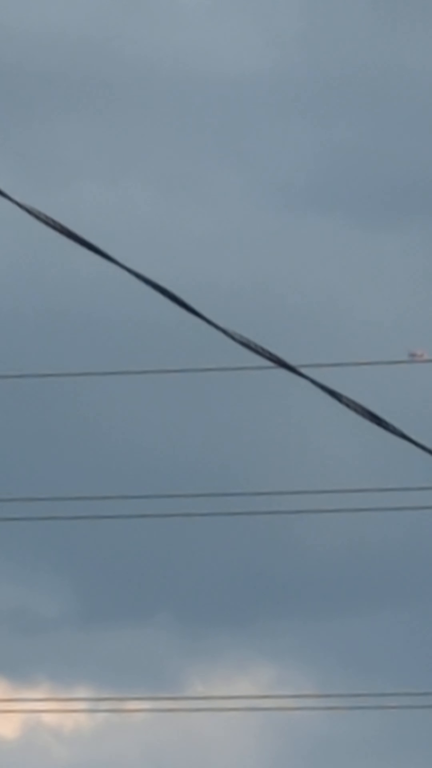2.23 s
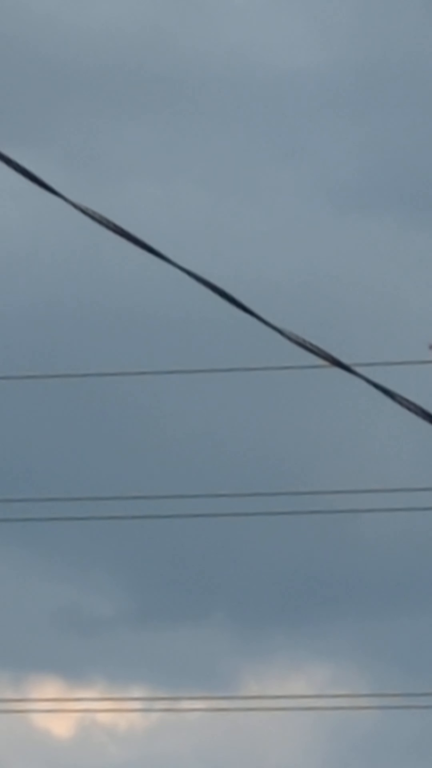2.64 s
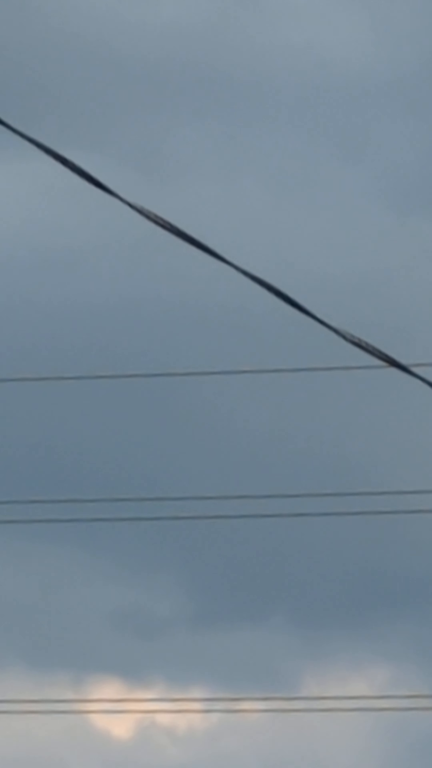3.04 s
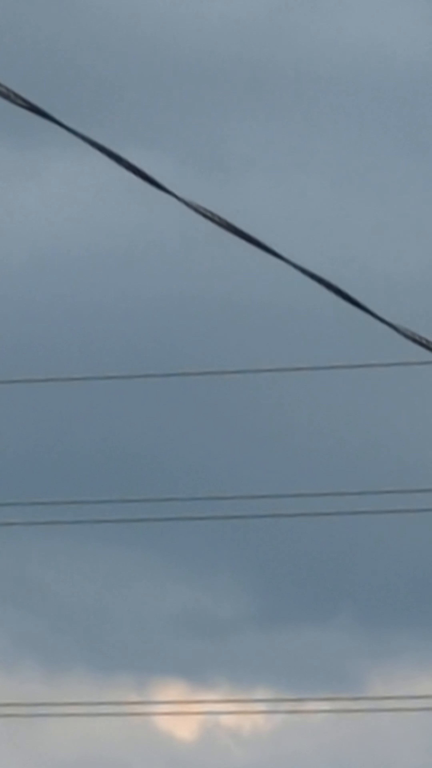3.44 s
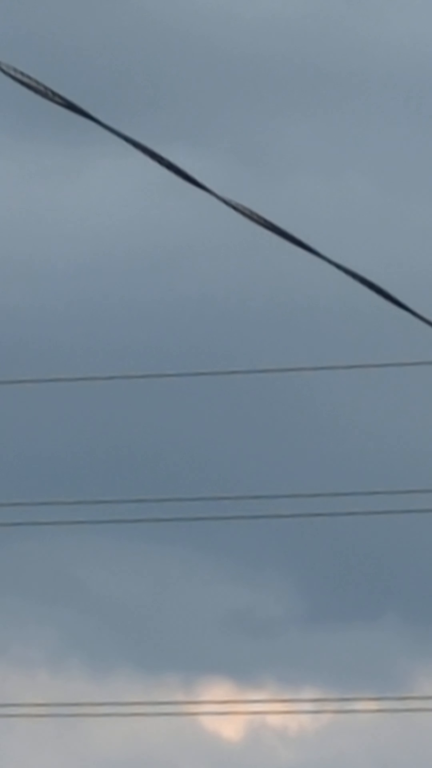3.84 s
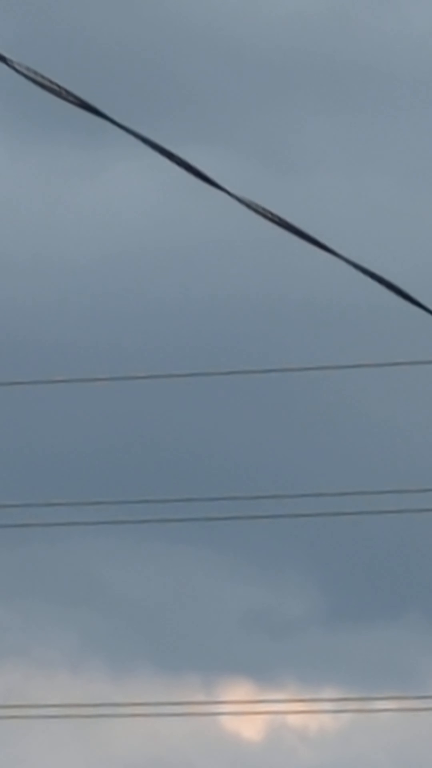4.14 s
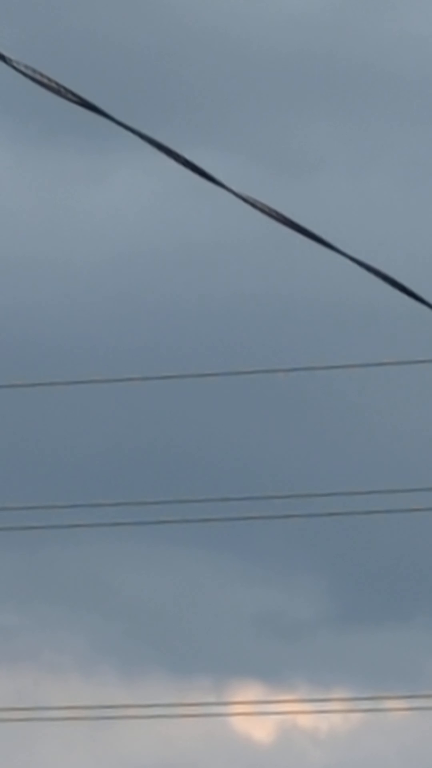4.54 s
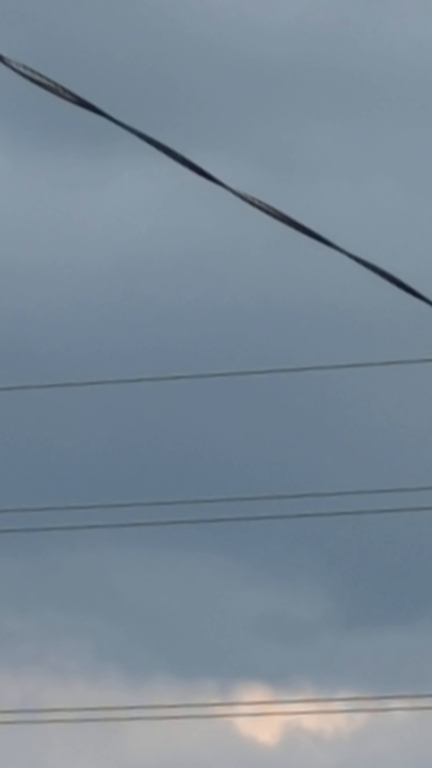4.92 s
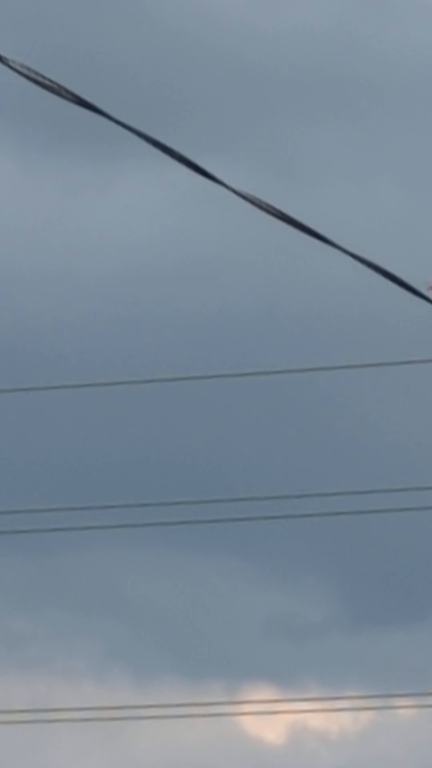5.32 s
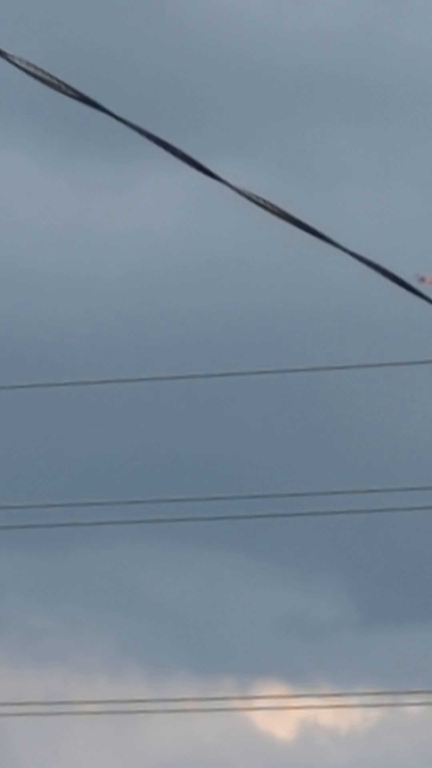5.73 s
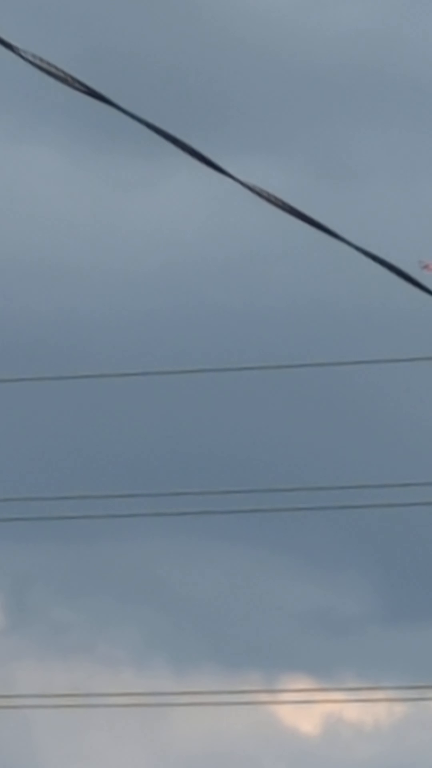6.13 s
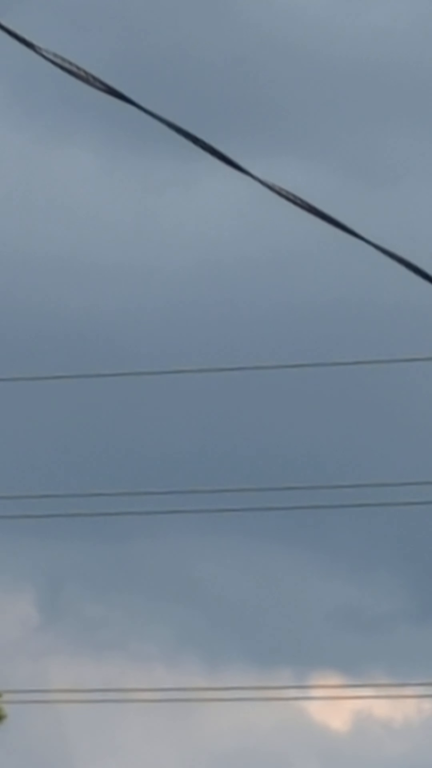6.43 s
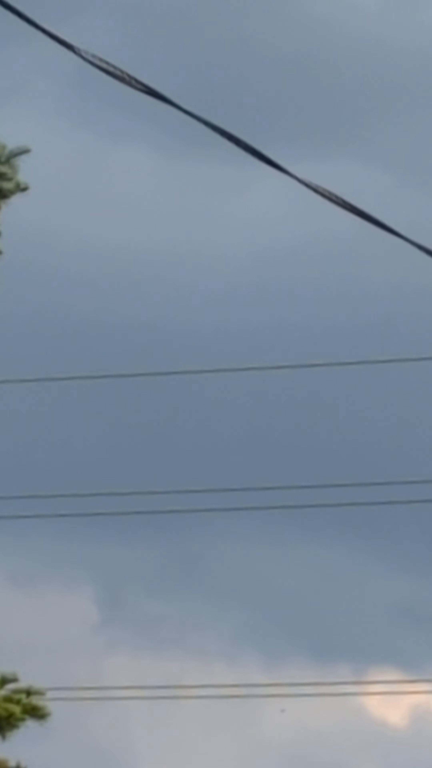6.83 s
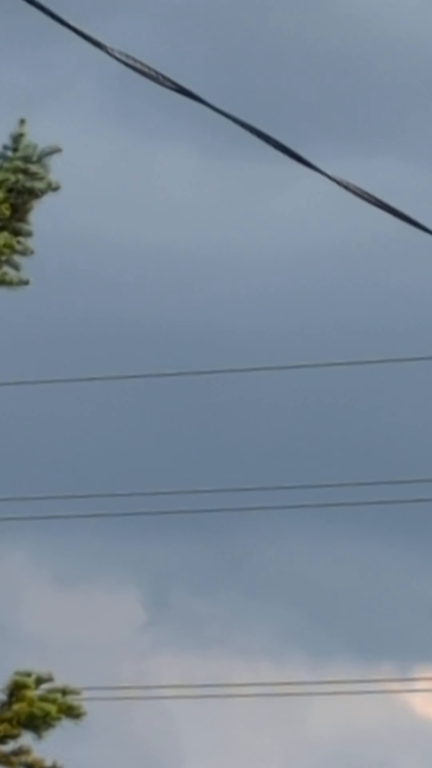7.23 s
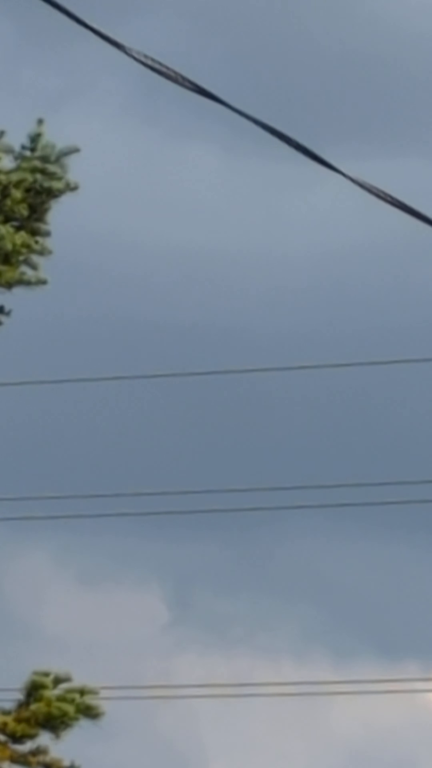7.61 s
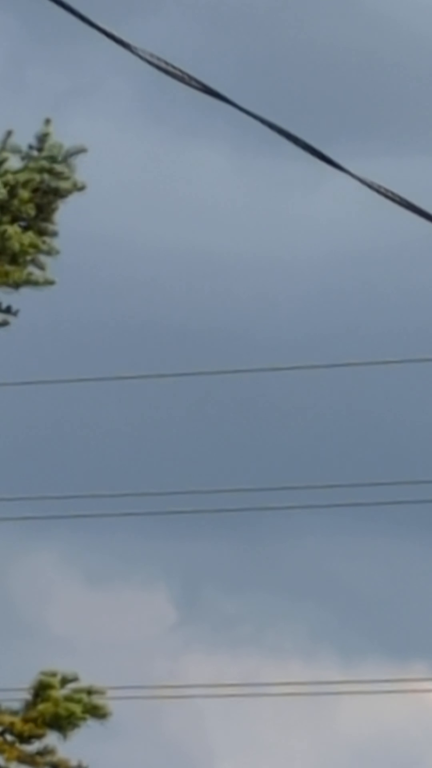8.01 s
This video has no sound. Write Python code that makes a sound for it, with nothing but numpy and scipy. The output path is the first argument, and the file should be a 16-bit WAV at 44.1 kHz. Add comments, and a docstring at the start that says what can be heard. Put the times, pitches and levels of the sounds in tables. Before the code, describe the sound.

Open-air stereo sound near a road: the throaty, wavering drone of a far-off radial-engine plane runs throughout, joined by thin cricket trills. Wind buffets the microphone in irregular low bumps, often stronger on one side. A mild whoosh of tyres comes near two seconds, a fainter one near four, then a much louder pass at six with low engine hum, fading before another approaches and something rustles briefly.

```python
"""From the start a biplane's seven-cylinder radial drones far overhead: shaft-locked tones creeping up in
pitch as its aspect turns, plus chopped noise. Crickets trill faintly, as falling notes with a fuzzy edge.
Gusts and thumps of low noise soon bump the microphone, and noise swells of hiss go by, most likely tyres.
The loudest, about six seconds in, brings gritty sizzle, a low exhaust hum of harmonics and thin whistles.
Another swell is building at the end, where a short rustle of bright noise comes."""
import sys
import numpy as np
from scipy import signal
from scipy.fft import rfft, irfft, next_fast_len
from scipy.io import wavfile
from scipy.ndimage import uniform_filter1d

SR = 44100
rng = np.random.default_rng(int(sys.argv[2]) if len(sys.argv) > 2 else 0)


def output_pcm(signal):
    """Save a mono or channel-first signal as 16-bit PCM at the path in sys.argv[1].

    Samples are clipped to [-1, 1] before scaling.
    """
    pcm = np.clip(np.atleast_2d(signal).T, -1, 1) * 32767
    wavfile.write(sys.argv[1], SR, np.round(pcm).astype(np.int16))


N = 360297
T = np.arange(N) / SR

# four-stroke cycle that sets every engine line: [t/s, rate/Hz]
ENGINE_CYCLE = [(0, 15.02), (.5, 15.13), (2.5, 15.79), (4, 16.1), (7, 16.45), (8.17, 16.64)]
# radiated engine lines, before offsets and fading; multiple 7 is firing, 4, 8, .. the two blades:
# [multiple of the cycle, nose-on level/dB, front-quarter level/dB, side-on level/dB,
#  rear-quarter level/dB, tail-on level/dB]
ENGINE_DIRECTIVITY = [(4, -47.5, -48.5, -56, -57.5, -56), (7, -64, -62, -52, -50, -50.5),
                      (8, -51.5, -58.5, -63, -59.5, -61), (9, -76, -65.5, -58.5, -72.5, -76),
                      (12, -72.5, -64, -73.5, -63, -59), (13, -76, -61, -72, -75, -72),
                      (14, -69, -70, -67.5, -74.5, -72.5), (15, -67.5, -69, -62.5, -57.5, -57),
                      (16, -52, -59, -64, -74, -60.5), (17, -65.5, -72, -56.5, -70, -61),
                      (18, -68.5, -71.5, -60.5, -57, -54.5), (19, -61, -58, -69, -55, -55),
                      (20, -58.5, -59.5, -54.5, -70.5, -66), (22, -64, -68, -75.5, -75, -70),
                      (24, -65, -64, -62.5, -67.5, -73.5), (27, -82.5, -70, -67, -69, -75),
                      (28, -73, -69, -66, -72, -75), (37, -71.5, -75.5, -76.5, -77.5, -79),
                      (38, -68, -75, -79, -67.5, -72)]
# which way the biplane faces: [t/s, aspect (0 nose on, 2 side on, 4 and above tail on)]
BIPLANE_ASPECT = [(1.4, 0), (2.15, 1.13), (2.8, 0.65), (3.9, 2.1), (4.4, 2), (4.9, 3), (6.35, 3), (7.3, 5)]
# drone as the air carries it down; only its swing about the median is used: [t/s, level/dB]
DRONE_CARRY = [(0.0, -59.5), (0.5, -53), (1.15, -57.5), (1.45, -53), (1.84, -55), (2.21, -48.5),
               (2.58, -53), (2.8, -62), (3.21, -67.5), (3.55, -55.5), (3.93, -48.5), (4.5, -52),
               (5.35, -53), (6.3, -50.5), (6.8, -55), (7.4, -51.5), (7.85, -58), (8.17, -55.5)]
# moments when one band swells: mostly the drone blooming, and at 0.22 s a brief low bump: # [t/s, half
# length/s, centre f/Hz, width/Hz, lift of the lines/dB, roar level/dB]
DRONE_BLOOMS = [(.22, 0.062, 134.9, 27, 4.5, -57), (0.63, 0.11, 570, 110, 3, -67),
                (1.458, 0.21, 267, 42, 3.5, -76), (2.02, 0.22, 501.5, 120, 3.5, -60),
                (2.204, 0.15, 209.8, 12, 1.5, -59), (2.598, 0.38, 125.2, 6, 6, -63),
                (2.723, 0.084, 320, 7.4, 8.5, -73), (3.4, 0.23, 1000, 350, -0.5, -68),
                (4.048, 0.18, 385, 12, 4, -70), (4.65, .28, 275, 6, 7.5, -76.5),
                (4.95, 0.17, 440.5, 24, 7.5, -68), (6.198, 0.3, 427.6, 47, 7, -66),
                (6.33, 0.1, 630, 55, 0, -61), (6.6, 0.26, 115.3, 22.6, 0.5, -52),
                (7.23, 0.093, 606, 68, 7, -63), (7.346, 0.3, 267, 14, 2.5, -66),
                (7.6, 0.35, 200.9, 6.6, 8, -67)]
# propeller wash spectrum, before its offset: [f/Hz, level/dB per Hz]
WASH_SPECTRUM = [(60, -93), (130, -79.5), (205, -80), (320, -80), (450, -83.5), (580, -83), (740, -88),
                 (1050, -94), (2500, -115)]

# vehicles going by: [closest t/s, clears cover t/s, approach time/s, leaving time/s,
#  tyre hiss level/dB, tread rasp level/dB, low roar level/dB]
VEHICLE_PASSES = [(2.04, 1.41, 0.85, 1.29, -67, -66.5, -55.5), (4.1, 1.6, 1, 0.86, -70.5, -75, -70),
                  (6.15, 5.18, 0.64, 1.065, -57.5, -55.5, -57), (8.3, 7.9, 0.85, .9, -67.5, -77.5, -71.5)]
PASS_FALLOFF = 3.1  # power of distance by which a vehicle fades
SCREEN_DB, EMERGE_S = -6, 0.14  # level drop while hidden; time constant of clearing cover
FAR_TYRES_DB = -85.5  # steady hiss from the rest of the road
# tyre hiss: [f/Hz, level/dB per Hz relative to the pass]
TYRE_SPECTRUM = [(100, -44.5), (520, -24.5), (800, -29.5), (1150, -28), (1800, -30.5), (2500, -33.5),
                 (3100, -35.5), (4000, -39), (5300, -46), (6500, -52.5), (9200, -58), (11000, -66.5),
                 (12500, -70.5), (14500, -78)]
# tread rasp, beamed sideways so that it peaks at the closest point: [f/Hz, level/dB per Hz relative]
TREAD_SPECTRUM = [(1100, -54), (1800, -35.5), (2350, -32), (2850, -35.5), (3500, -48), (5000, -66.5)]
TREAD_BEAM, TREAD_RASP_DB = 2.6, 3  # fade exponent relative to the hiss; depth of the patches
# low roar of a vehicle: [f/Hz, level/dB per Hz relative to the pass]
ROAR_SPECTRUM = [(80, -37.5), (200, -20.5), (280, -25), (400, -28), (580, -30.5), (800, -33.5),
                 (1500, -42.5), (2500, -55)]
# exhaust of the loudest vehicle, before the overtone levels: [t/s, firing f/Hz, level/dB]
EXHAUST_HUM = [(5.1, 42.57, -63), (5.45, 41.45, -43.5), (5.7, 40.46, -36), (6.1, 40.93, -40.5),
               (6.5, 41.17, -39), (6.75, 42.22, -32), (7.2, 42.26, -31.5), (7.7, 43.3, -34.5),
               (8.17, 43.45, -40)]
# exhaust overtones: [multiple of the firing rate, relative level/dB]
EXHAUST_ORDERS = [(1, -3.5), (2, -24), (3, -34.5)]
HISS_THROB = .14  # how deeply the exhaust beat chops the hiss (0-1)
# sizzle of grit under the nearest tyres: [t/s, level/dB]
SIZZLE_SWELL = [(5.3, -108), (5.55, -81), (5.85, -72), (6.3, -77), (6.65, -76), (6.95, -76.5), (7.4, -94)]
# sizzle colour: [f/Hz, level/dB per Hz relative to the swell]
SIZZLE_SPECTRUM = [(2500, -53.5), (4000, -33.5), (5300, -34.5), (6600, -43), (9000, -47), (11300, -50.5),
                   (13500, -59)]
GRIT_DB, GRIT_HZ = 3, 130  # depth and rate of the crackle
# ticks of flung grit: [t/s, half length/s, level/dB]
GRIT_TICKS = [(5.632, .005, -71)]
# thin traffic whistles, one list each: [t/s, f/Hz, level/dB]
WHISTLE_PATHS = [
    [(5.5, 1738, -82), (5.8, 1740, -72), (6.35, 1742, -69), (6.8, 1740, -80), (7.4, 1740, -80),
     (7.9, 1741, -75), (8.17, 1740, -79)],
    [(2.3, 9800, -110), (2.4, 10100, -101), (2.52, 10350, -101), (2.58, 10750, -109), (2.68, 10300, -104),
     (2.75, 9850, -110)],
    [(5.75, 11100, -106), (6.05, 11250, -98), (6.45, 11700, -103), (6.9, 12350, -102.5),
     (7.35, 12700, -118)],
]
# fuzz of each whistle in turn: [width/Hz]
WHISTLE_WIDTHS = [4, 130, 240]
# low rumble of engines on the road: [t/s, relative level/dB]
RUMBLE_SWELL = [(0, -0.5), (1.2, 0.5), (2, -7), (3.2, -2), (3.8, -7), (4.9, -9), (5.7, -0.5), (6.7, 2.5),
                (7.3, -1.5), (8.17, -4.5)]
# rumble colour: [f/Hz, level/dB per Hz]
RUMBLE_SPECTRUM = [(30, -77), (52, -65.5), (70, -56.5), (88, -70.5), (130, -78.5), (180, -85), (300, -102)]

BREEZE_DB, EDDY_DB, EDDY_HZ = -59, 2.5, 3.8  # steady wind level; depth and rate of its eddies
# gusts on the microphone: [t/s, half length/s, left level/dB, right level/dB]
WIND_GUSTS = [(.95, 0.17, -57, -55), (1.32, 0.11, -51, -49), (1.64, 0.07, -43.5, -54),
              (1.88, 0.042, -46, -60), (2.08, 0.047, -45.5, -58), (2.32, 0.049, -41, -47.5),
              (2.66, 0.056, -42, -61), (2.97, 0.072, -48, -54), (3.16, 0.06, -44, -54),
              (3.44, 0.044, -49, -46), (3.61, 0.065, -51.5, -42), (4.05, .04, -58, -53),
              (4.32, 0.064, -62, -51.5), (5.27, 0.048, -52, -51), (5.42, 0.023, -46.5, -54),
              (5.62, 0.16, -45, -57), (6.55, 0.1, -49, -57), (6.82, 0.13, -45, -56),
              (7.8, 0.25, -62, -58.5)]
# wind buffeting: [f/Hz, level/dB per Hz relative to the gust]
BUFFET_SPECTRUM = [(5, -13), (15, -8.5), (30, -4), (50, -11), (80, -28), (130, -35), (220, -44.5),
                   (500, -71.5), (1500, -110)]
# sharper wind thumps: [t/s, half length/s, left level of the suck/dB, right level of the suck/dB]
WIND_THUMPS = [(1.356, 0.0088, -51, -30), (1.691, 0.0051, -51, -21.5), (1.72, 0.0087, -20, -33),
               (2.877, 0.0054, -20.5, -47), (2.951, 0.0094, -22, -45), (3, 0.0041, -25, -34),
               (3.139, 0.0094, -27, -40), (3.218, 0.0045, -25, -38), (6.895, 0.0078, -25, -45),
               (6.973, 0.0036, -21.5, -44)]
# turbulence in the thumps, before the wake and thump levels: [f/Hz, level/dB per Hz]
THUMP_SPECTRUM = [(8, -29.5), (30, -28.5), (70, -21), (130, -20.5), (200, -38.5), (500, -78.5),
                  (1500, -100)]
# brushes of the rustle: [t/s, half length/s, level/dB]
RUSTLE_BRUSHES = [(8.121, 0.0038, -66), (8.136, 0.0071, -64.5), (8.16, 0.014, -72)]
# rustle colour: [f/Hz, level/dB per Hz relative to the brush]
RUSTLE_SPECTRUM = [(1000, -65), (3500, -43), (6000, -38), (9500, -37), (11500, -50), (14000, -66)]
# cricket voices: [f/Hz, fall within a pulse/Hz, pulse rate/Hz, sounding share (0-1), width/Hz,
#  L-R level/dB, port lag/turns]
CRICKET_VOICES = [(4215, 300, 42.2, .8, 40, -4, .2), (4180, 140, 45.5, 1, 80, -3, .13),
                  (8330, 260, 17.5, .9, 110, 1, .38)]
# how loudly each cricket sings: [t/s, first level/dB, second level/dB, third level/dB]
CRICKET_SWELL = [(0, -85.3, -92, -101), (2.3, -82.7, -90, -97), (3.5, -84.2, -90.5, -102),
                 (5, -89.5, -93, -95.5), (5.8, -90, -94, -93), (8.17, -92, -95.5, -100)]
CRICKET_FUZZ = .45  # rms of the grass-scattered fuzz beside a steady note of rms 1
# distant outdoors with a haze of far insects on top: [f/Hz, level/dB per Hz]
BACKGROUND_SPECTRUM = [(12, -68), (35, -67), (80, -68), (160, -81.5), (250, -86), (450, -91), (700, -93),
                       (920, -90), (1250, -96.5), (1750, -99.5), (3000, -111), (5000, -123), (6700, -127),
                       (8200, -122.5), (9200, -133), (14000, -140)]

# how alike far sound is at the two microphone ports: [f/Hz, likeness (0-1)]
FAR_PORT_LIKENESS = [(30, .92), (120, .9), (250, .92), (600, .93), (1200, .75), (1800, .66), (2800, .38),
                     (4300, .38), (6000, .15), (7200, .2), (8300, .6), (9500, .08)]
# far sound between the ports: [f/Hz, L-R level/dB]
FAR_PORT_BALANCE = [(30, 0.5), (500, -2.5), (1100, -0.5), (2200, -4.5), (4000, -2), (6000, 2), (12000, 2.5)]
# how alike road sound is at the ports: [f/Hz, likeness (0-1)]
ROAD_PORT_LIKENESS = [(100, .94), (600, .85), (1200, .65), (2500, .67), (4000, .56), (5200, .66),
                      (7500, .6), (8800, .68), (10200, .25), (12000, .3)]
# road sound between the ports: [f/Hz, L-R level/dB]
ROAD_PORT_BALANCE = [(400, 0.5), (1100, -2), (2300, -6.5), (3500, -5), (5200, -3.5), (8000, 1),
                     (10000, 3.5), (12000, -2)]
FAR_PORTS = FAR_PORT_LIKENESS, FAR_PORT_BALANCE
ROAD_PORTS = ROAD_PORT_LIKENESS, ROAD_PORT_BALANCE
EDGE_HZ = 14500  # top of the passband


def gain_of(db):
    """Decibels to amplitude."""
    return 10 ** (np.asarray(db) / 20)


def evened(x):
    """Scales to rms 1."""
    return x / np.sqrt(np.mean(abs(x) ** 2) + 1e-30)


def curves(rows):
    """Each column of a table as a line through time."""
    s, *columns = np.transpose(rows)
    return [np.interp(T, s, column) for column in columns]


def read(points, hz):
    """A spectrum joined by straight lines over log frequency."""
    f, value = np.transpose(points)
    return np.interp(np.log(hz + 1), np.log(f), value)


def panned(db):
    """Left and right gains for a level difference, at constant power."""
    ratio = gain_of(np.atleast_1d(db))
    return np.array([ratio, np.ones_like(ratio)]) * np.sqrt(2 / (1 + ratio ** 2))


def bump(s, half_s):
    """A smooth bell in time."""
    return np.exp(-((T - s) / half_s) ** 2 / 2)


def wander(hz, size=16384):
    """Smooth random drift of rms 1 that moves up to about hz times a second."""
    f = np.fft.rfftfreq(size, T[-1] / size)
    lowpass = np.exp(-(f / hz) ** 2 / 2) * (f > 0)
    slow = irfft(rfft(rng.standard_normal(size)) * lowpass)
    return np.interp(T, np.linspace(0, T[-1], size), evened(slow))


def noise(spectrum, likeness=None, balance=None, lag_ms=0):
    """Noise at two ports: unrelated, or partly alike with the left port late and its balance tilted."""
    size = next_fast_len(N, True)
    hz = np.fft.rfftfreq(size, 1 / SR)
    roll_off = np.maximum(1, hz / spectrum[-1][0]) ** -4  # above the last point
    shape = gain_of(read(spectrum, hz)) * roll_off * np.sqrt(SR / 2)
    z = rfft(rng.standard_normal((2, size))) * shape
    if likeness is not None:
        same = np.clip(read(likeness, hz), 0, 1)
        late = np.exp(-2j * np.pi * hz * lag_ms / 1000)
        right = same * z[0] + np.sqrt(1 - same ** 2) * z[1]
        z = np.array([z[0] * late, right]) * panned(read(balance, hz))
    return irfft(z, size)[:, :N]


def fuzzy_tone(hz, width_hz):
    """A narrow band of noise that follows a pitch curve."""
    phase = 2 * np.pi * np.cumsum(hz) / SR
    return wander(width_hz) * np.cos(phase) + wander(width_hz) * np.sin(phase)


def biplane(lines_db=-4.0, fade_db=1.0, shimmer=0.07, jitter=0.00057, apart=0.065, low_hz=170, depth=1.2):
    """Engine and propeller lines on one shaft; turbulence makes each fade, and the aspect shifts the balance."""
    cycle_hz, = curves(ENGINE_CYCLE)
    aspect, = curves(BIPLANE_ASPECT)
    drone_db, = curves(DRONE_CARRY)
    carry_db = drone_db - np.median(drone_db)
    turns = np.cumsum(cycle_hz * (1 + jitter * wander(5))) / SR
    out = np.zeros((2, N))
    for multiple, *views_db in ENGINE_DIRECTIVITY:
        order = round(multiple)
        line_hz = order * cycle_hz.mean()
        exposed = 1 / (1 + (low_hz / line_hz) ** 4)  # long waves pass the eddies unharmed
        air_db = exposed * (lines_db + depth * carry_db) + fade_db * wander(1.1)
        for s, half_s, hz, width_hz, lift_db, _ in DRONE_BLOOMS:
            if abs(line_hz - hz) < 2 * width_hz:
                air_db += lift_db * bump(s, half_s) * np.exp(-((line_hz - hz) / width_hz) ** 2 / 2)
        size = np.interp(aspect, np.arange(len(views_db)), gain_of(views_db)) * gain_of(air_db)
        phase = 2 * np.pi * (order * turns + rng.random()) + shimmer * wander(9.1)
        line = np.sqrt(2) * size * (1 + shimmer * wander(3.9)) * np.cos(phase)
        out += line * (1 + apart * wander(1.0) * np.array([[-1], [1]]))  # drifts between the ports
    return out + propeller_wash(turns, carry_db) + bloom_roar(turns)


def propeller_wash(turns, carry_db, wash_db=-8, follow=0.76, throb=0.18):
    """Turbulent roar, chopped four times a cycle by the blades; it swells and fades with the drone."""
    chop = 1 + throb * np.cos(2 * np.pi * 4 * turns)
    return noise(WASH_SPECTRUM, *FAR_PORTS, lag_ms=0.048) * gain_of(wash_db + follow * carry_db) * chop


def bloom_roar(turns, throb=0.75):
    """Each bloom carries a band of roar that throbs once an engine cycle."""
    roar = np.zeros(N)
    for s, half_s, hz, width_hz, _, level_db in DRONE_BLOOMS:
        roar += fuzzy_tone(np.full(N, hz), width_hz) * bump(s, half_s) * gain_of(level_db)
    return roar * (1 + throb * np.cos(2 * np.pi * turns))


def traffic():
    """Vehicles hiss and roar as they pass; one firing rhythm drives the hum and the throb of the hiss."""
    firing_hz, hum_db = curves(EXHAUST_HUM)
    phase = 2 * np.pi * np.cumsum(firing_hz * (1 + 0.0079 * wander(4.4))) / SR
    sounding = T > EXHAUST_HUM[0][0]
    roar = noise(ROAR_SPECTRUM, *ROAD_PORTS) * all_passes(6)
    return exhaust_hum(phase, hum_db, sounding) + tyre_hiss(phase, sounding) + roar


def tyre_hiss(phase, sounding, flutter_db=1.19):
    """Tyre and tread noise torn into patches; it flutters, and throbs while the exhaust hums."""
    hiss_level = np.hypot(all_passes(4), gain_of(FAR_TYRES_DB))
    tyres = rasp(noise(TYRE_SPECTRUM, *ROAD_PORTS, lag_ms=0.054)) * hiss_level
    tread = rasp(noise(TREAD_SPECTRUM, *ROAD_PORTS, lag_ms=0.075), TREAD_RASP_DB)
    tyres += tread * all_passes(5, TREAD_BEAM)
    throb = 1 + HISS_THROB * sounding * np.cos(phase)
    return tyres * gain_of(flutter_db * wander(19)) * throb


def exhaust_hum(phase, hum_db, sounding):
    """Exhaust pulses as a firing tone and its overtones, slightly unsteady in level."""
    size = gain_of(hum_db + 0.67 * wander(2.7)) * sounding
    tones = sum(gain_of(db) * np.cos(round(order) * phase + rng.uniform(0, 2 * np.pi))
                for order, db in EXHAUST_ORDERS)
    return np.sqrt(2) * size * tones


def all_passes(level_column, focus=1):
    """Vehicles add in power; focus sharpens each swell around the closest point."""
    return np.sqrt(sum((passing(*row[:4]) ** focus * gain_of(row[level_column])) ** 2
                       for row in VEHICLE_PASSES))


def passing(s, emerges_s, come_s, go_s):
    """Fades by a power of distance as a vehicle drives past, 1 when closest and clear of cover."""
    along = (T - s) / np.where(T < s, come_s, go_s)
    hidden = .5 - .5 * np.tanh((T - emerges_s) / EMERGE_S)
    return np.hypot(1, along) ** -PASS_FALLOFF * gain_of(SCREEN_DB * hidden)


def rasp(x, depth_db=1.5, size=192):
    """Tread tearing at a rough surface: the hiss breaks into patches a few ms long and about 1 kHz wide."""
    z = signal.stft(x, nperseg=size)[2]
    patches = uniform_filter1d(rng.standard_normal(z.shape[1:]), size=5, axis=0)  # across frequency
    patches = uniform_filter1d(patches, size=3, axis=1)  # across time
    torn = z * evened(gain_of(depth_db * evened(patches)))
    return signal.istft(torn, nperseg=size)[1][:, :N]


def sizzle():
    """Fine grit crackles under the nearest tyres as fluctuating noise, and one flung piece ticks."""
    crackle = evened(gain_of(GRIT_DB * wander(GRIT_HZ)))
    ticks = sum(bump(s, half_s) * gain_of(db) for s, half_s, db in GRIT_TICKS)
    size = gain_of(curves(SIZZLE_SWELL)[0]) * crackle + ticks
    return noise(SIZZLE_SPECTRUM, *ROAD_PORTS, lag_ms=0.06) * size


def whistles(waver_db=2):
    """Whine and squeal of turning parts as narrow noise bands, coming and going."""
    out = np.zeros((2, N))
    for rows, width_hz in zip(WHISTLE_PATHS, WHISTLE_WIDTHS):
        hz, db = curves(rows)
        sounding = (T > rows[0][0]) * (T < rows[-1][0])
        out += fuzzy_tone(hz, width_hz) * gain_of(db + waver_db * wander(6)) * sounding
    return out * panned(-1.6)


def road_rumble(surge_db=0.44, surge_hz=5):
    """Only the lowest engine sound carries from far down the road, in uneven surges."""
    size = gain_of(curves(RUMBLE_SWELL)[0] + surge_db * wander(surge_hz))
    return noise(RUMBLE_SPECTRUM, *FAR_PORTS) * size


def wind():
    """Gusts ride on a light breeze and break into eddies at each port."""
    eddies = gain_of(EDDY_DB * np.array([wander(EDDY_HZ), wander(EDDY_HZ)]))
    gusts = sum(bump(s, half_s) * gain_of([[left_db], [right_db]])
                for s, half_s, left_db, right_db in WIND_GUSTS)
    return noise(BUFFET_SPECTRUM) * (gain_of(BREEZE_DB) + gusts) * eddies


def thumps(wake_db=-15, wake_s=0.026):
    """A tight eddy crosses a port: a quick suck between two softer pushes, in a short burst of turbulence."""
    wake = noise(THUMP_SPECTRUM) * gain_of(wake_db)
    out = np.zeros((2, N))
    for s, half_s, left_db, right_db in WIND_THUMPS:
        suck = (((T - s) / half_s) ** 2 - 1) * bump(s, half_s)
        out += (suck + wake * bump(s, wake_s)) * gain_of([[left_db], [right_db]])
    return out


def rustle():
    """Quick overlapping brushes of bright noise, towards the left."""
    brushes = sum(bump(s, half_s) * gain_of(db) for s, half_s, db in RUSTLE_BRUSHES)
    return noise(RUSTLE_SPECTRUM) * brushes * panned(9.4)


def crickets():
    """Each wing stroke is a short note that falls in pitch; the grass scatters some of it into fuzz."""
    out = np.zeros((2, N))
    for voice, level_db in zip(CRICKET_VOICES, curves(CRICKET_SWELL)):
        hz, fall_hz, rate, share, width_hz, pan_db, lag = voice
        pulse = np.cumsum(rate * (1 + .008 * wander(12))) / SR % 1
        stroke = np.minimum(pulse / share, 1)  # 0-1 through the note, then silent
        pitch = hz + fall_hz * (.5 - stroke ** 2) + 0.18 * width_hz * wander(rate)
        turns = np.cumsum(pitch) / SR
        ports = np.array([np.sqrt(2) * np.cos(2 * np.pi * (turns - late))
                          + CRICKET_FUZZ * fuzzy_tone(pitch, width_hz) for late in (lag, 0)])
        out += evened(ports * np.sin(np.pi * stroke)) * gain_of(level_db) * panned(pan_db)
    return out


def background():
    """Distant outdoor sound and far insects merge into steady shaped noise."""
    return noise(BACKGROUND_SPECTRUM, *FAR_PORTS, lag_ms=0.035)


def scene():
    """Open air: all sources simply add."""
    road = traffic() + sizzle() + whistles() + road_rumble()
    air = wind() + thumps()
    return biplane() + road + air + rustle() + crickets() + background()


def record(dry):
    """A soft start and stop, then a linear-phase filter that limits the band."""
    soft = dry * signal.windows.tukey(N, .0015)
    lowpass = signal.firwin(511, EDGE_HZ, window=("kaiser", 9), fs=SR)
    return signal.oaconvolve(soft, lowpass[None], "same")


dry = scene()
out = record(dry)
output_pcm(out)
```